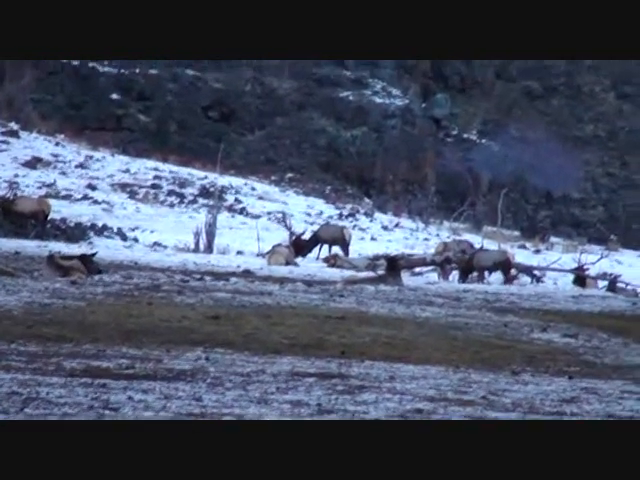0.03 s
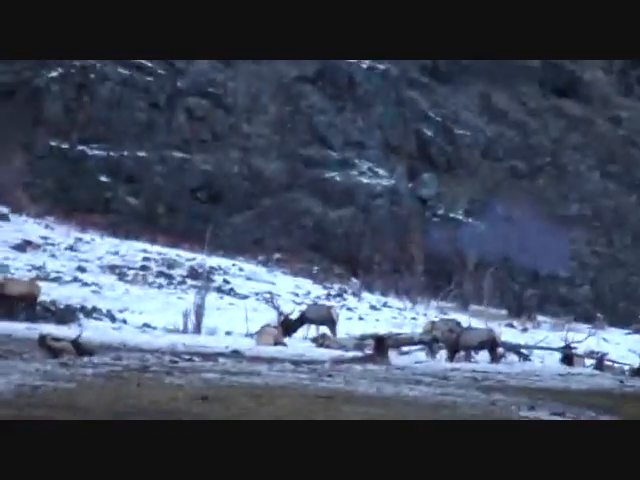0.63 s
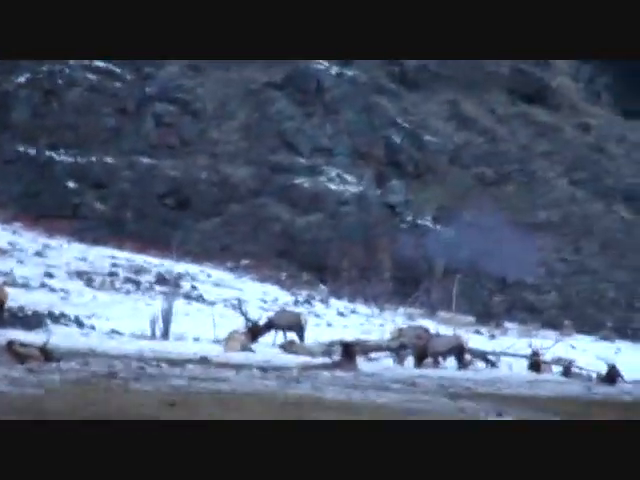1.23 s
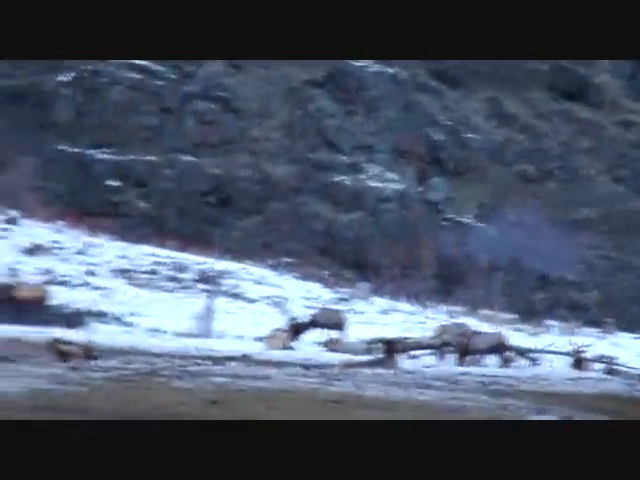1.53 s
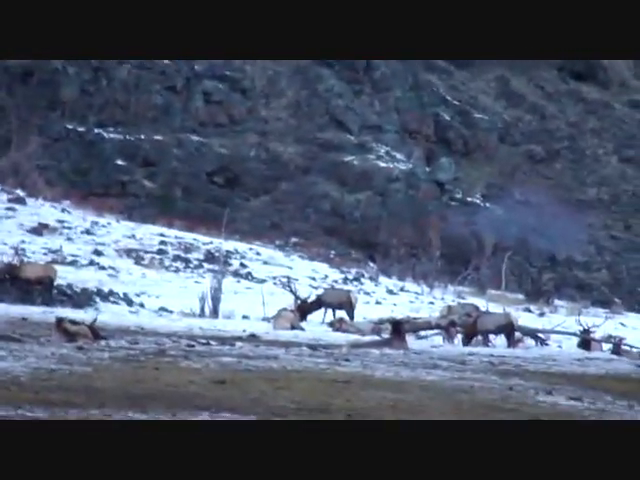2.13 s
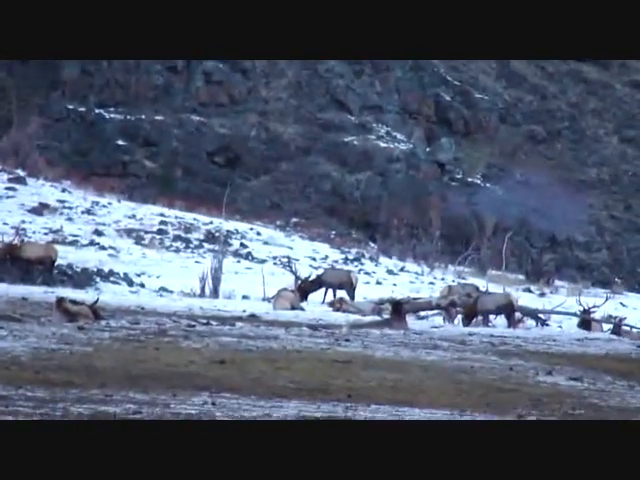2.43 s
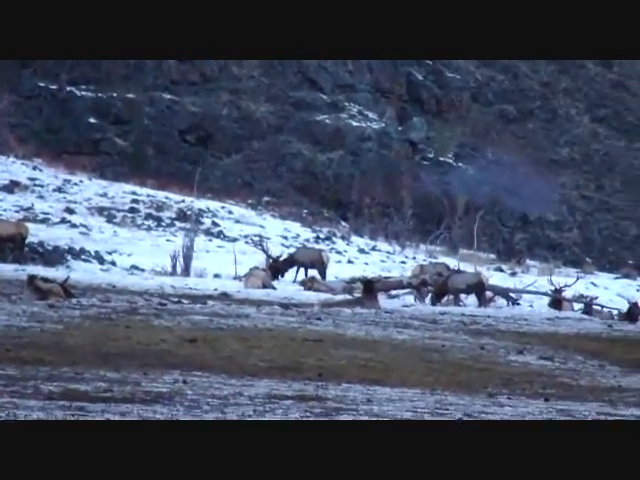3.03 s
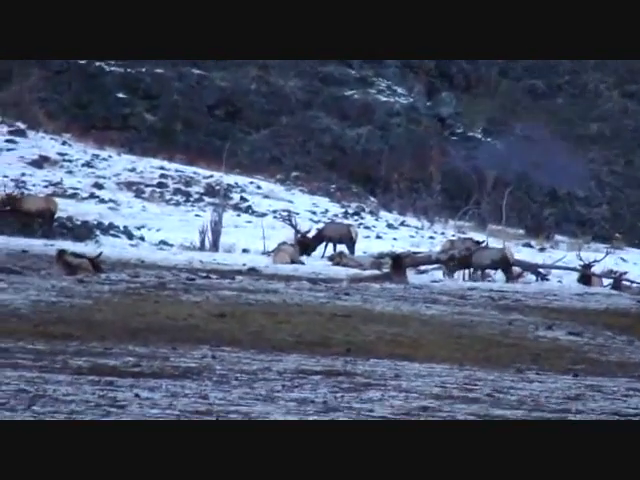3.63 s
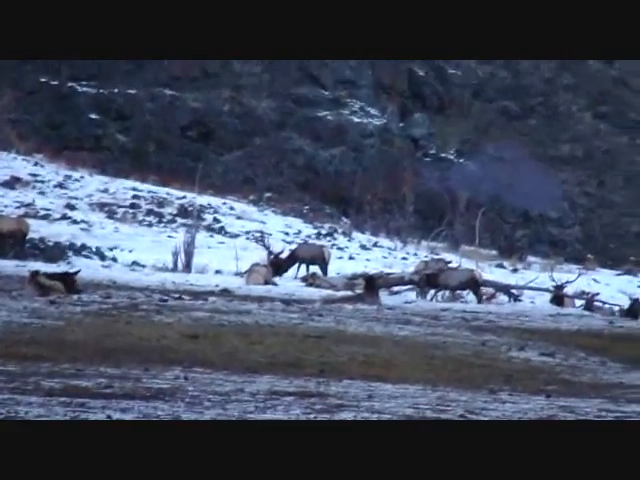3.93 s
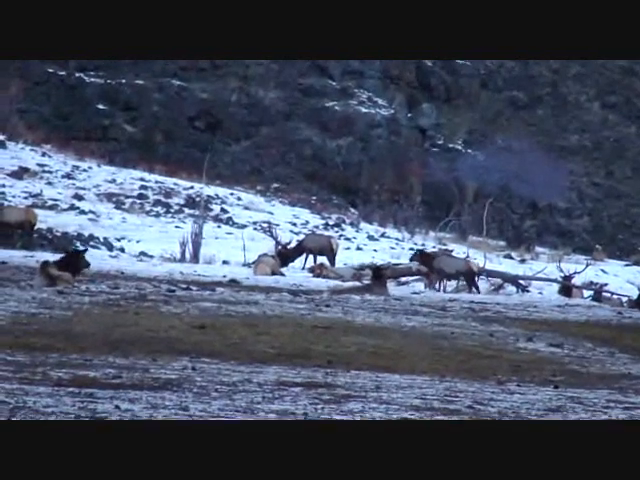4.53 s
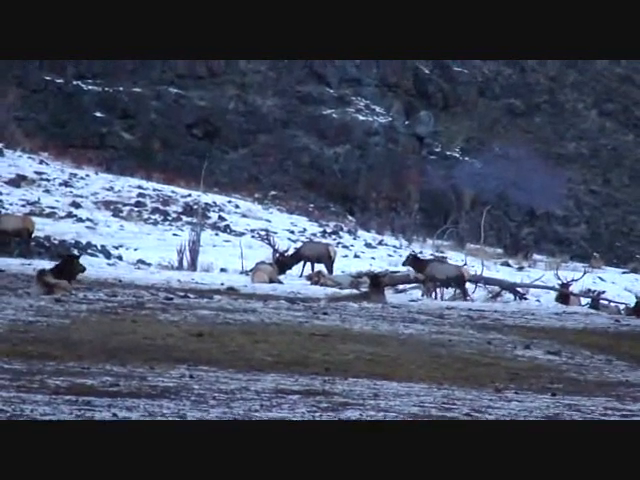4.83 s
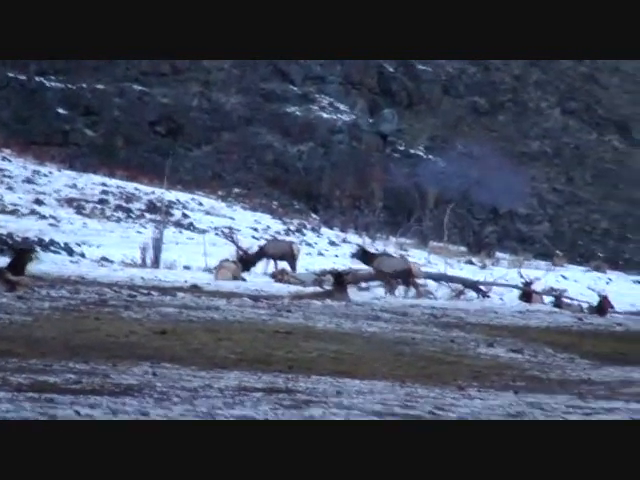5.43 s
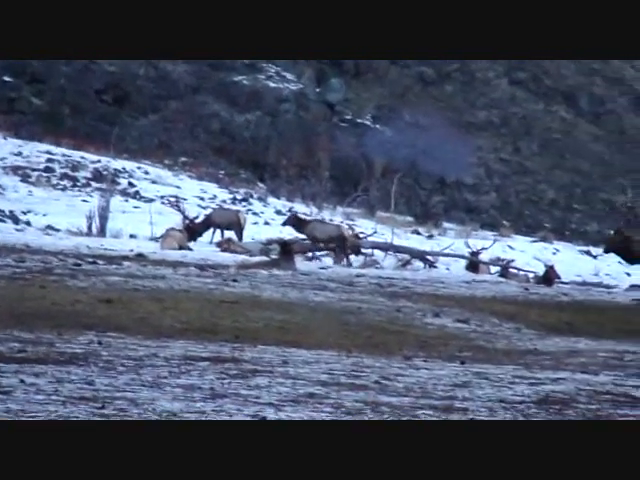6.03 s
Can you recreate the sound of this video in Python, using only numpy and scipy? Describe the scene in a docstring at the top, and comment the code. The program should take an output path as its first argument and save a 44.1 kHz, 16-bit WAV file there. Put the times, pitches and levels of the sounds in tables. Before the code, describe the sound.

Distant elk give thin, high mews over a steady outdoor rush, while fingers knock and rub close to the microphone.

```python
"""Elk on a snowy slope

Far elk mew: tight vocal folds give thin, high squeals that break and slide down, scattered by the
hillside along with two pipes from a small bird. Midway a faint, thin tone holds near 2.9 kHz.
Up close, fingers knock and rub on a hand-held camera, ringing its case. The camera whines faintly;
the valley rushes and drones behind it all."""
import sys
import numpy as np
from scipy import signal
from scipy.fft import rfft, irfft, next_fast_len
from scipy.io import wavfile

SR = 44100
rng = np.random.default_rng(int(sys.argv[2]) if len(sys.argv) > 2 else 0)


def to_wav(sig):
    """Store sig (one row per channel, or 1-D mono) as 16-bit WAV at the path in sys.argv[1].

    Samples outside -1..1 are clipped; the rate is SR.
    """
    pcm = np.clip(np.atleast_2d(sig), -1, 1) * 32767
    pcm = np.round(pcm).astype(np.int16)
    wavfile.write(sys.argv[1], SR, pcm.T)  # frames by channels


N = 276948
T = np.arange(N) / SR
FREQS = np.fft.rfftfreq(N, 1 / SR)


def undb(db):
    """Decibels to gain."""
    return 10 ** (np.asarray(db) / 20)


def unit(x):
    """Scale to rms 1."""
    return x / np.sqrt(np.mean(x ** 2))


def equalise(x, curve):
    """Filter by an EQ curve of (f/Hz, gain/dB) points; rms 1."""
    hz, db = np.transpose(curve)
    gain = undb(np.interp(np.log(np.maximum(FREQS, 1)), np.log(hz), db))
    return unit(irfft(rfft(x) * gain, N))


def noise_band(hz, width_hz, size=N):
    """Noise in one narrow bell; rms 1."""
    padded = next_fast_len(size, real=True)
    f = np.fft.rfftfreq(padded, 1 / SR)
    bell = np.exp(-2 * ((f - hz) / width_hz) ** 2)
    return unit(irfft(rfft(rng.standard_normal(padded)) * bell, padded)[:size])


def wobble(rate_hz, size=N):
    """Random modulation up to about the given rate; rms 1."""
    return noise_band(0, rate_hz, size)


# EQ of the valley bed: f/Hz, gain/dB
VALLEY_EQ = [(25, -24), (55, -32.5), (110, -16), (255, -9), (330, -3), (400, -6.5), (500, -0.5), (720, -3),
             (1150, -3.5), (2000, -11), (3000, -17), (4500, -20.5), (7800, -24), (11000, -26)]
def valley(level_db=-47.5, swell_db=1.05, flicker_db=1.0):
    """A distant rush whose octaves swell together and flicker alone."""
    octaves = np.log2(np.maximum(FREQS, 1))
    spectrum = rfft(equalise(rng.standard_normal(N), VALLEY_EQ))
    rush = np.zeros(N)
    for centre in range(4, 15):
        octave_band = irfft(spectrum * np.maximum(1 - np.abs(octaves - centre), 0), N)
        rush += octave_band * undb(flicker_db * wobble(20.5))
    return unit(rush) * undb(level_db + swell_db * wobble(0.75))


# Slow swell of one distant drone: t/s, level/dB
DRONE_SWELL = [(0, -66), (4.2, -63.5), (5.15, -57), (6.28, -60.5)]
# Narrow drones and whines: f/Hz, width/Hz, level/dB
HUM_BANDS = [(275.8, 8.4, -67.5), (300, 19, -64.5), (569, 46, -63), (2880, 82, -73), (7860, 8, -75.5),
             (7920, 110, -72)]
def hums(motor_hz=70.8, motor_db=-78, waver=.3):
    """Low distant drones, and the faint hum and whine of the running camera."""
    motor = np.sqrt(2) * np.sin(2 * np.pi * motor_hz * T) * (1 + waver * wobble(3.9))
    drone = undb(np.interp(T, *np.transpose(DRONE_SWELL))) * noise_band(hz=499, width_hz=43)
    steady = sum(undb(db) * noise_band(hz, width) for hz, width, db in HUM_BANDS)
    return undb(motor_db) * motor + drone + steady


# EQ of skin hissing on the case: f/Hz, gain/dB
RUB_EQ = [(80, -28), (300, -27), (1000, 3), (2000, 1.5), (3200, 3), (4500, -0.5), (6000, -2.5), (7000, 3),
          (7850, 4.5), (8800, -0.5), (11000, -11)]
# Finger strokes: start/s, rise/s, fall/s, level/dB
FINGER_STROKES = [(.338, .02, .015, -40), (.493, .007, .012, -49), (.657, .012, .08, -42),
                  (.69, .085, .085, -42), (.785, .105, .045, -37.8), (1.048, .007, .043, -36.7),
                  (1.17, .035, .055, -48.5), (1.225, .04, .03, -49.5), (1.47, .06, .06, -56),
                  (1.545, .06, .045, -41), (1.685, .025, .075, -50.5), (3.15, .07, .1, -52),
                  (3.31, .035, .03, -49), (3.345, .095, .085, -46.7)]
def rubbing(resting_db=-71, grain_db=3.5, grip_db=1.0, speed_curve=1.5):
    """Tiny slips of skin on plastic hiss through the case, louder as each stroke speeds up."""
    slips = rng.standard_normal(N) * undb(grain_db * rng.standard_normal(N))
    power = undb(resting_db) ** 2
    for start, rise, fall, db in FINGER_STROKES:
        speed = np.interp(T, [start, start + rise, start + rise + fall], [0, 1, 0])
        power = power + undb(db) ** 2 * speed ** speed_curve
    unsteady_grip = undb(grip_db * wobble(86))
    return equalise(slips, RUB_EQ) * np.sqrt(power) * unsteady_grip


# Modes of the camera's case: f/Hz, gain/dB, t60/s
CASE_MODES = [(196, -15, 0.019), (524, -8, 0.014), (810, -3, 0.018), (1160, 7, 0.0082), (1630, -3, 0.015),
              (1890, -3, 0.011), (2370, 0, 0.0084), (2920, -0.5, 0.013), (3420, -16, 0.032),
              (4230, -11, 0.0084), (5150, -3, 0.0072), (7040, -2.5, 0.0073), (7530, -3, 0.0074)]
# Finger knocks: t/s, level over 4 ms/dB, favoured f/Hz, fall-off either side/(dB per octave)
FINGER_KNOCKS = [(0.3504, -27.5, 1700, 14), (.3599, -21, 4800, 21), (0.3609, -18.5, 2840, 20),
                 (0.5004, -37.5, 7500, 7), (0.5036, -37.5, 190, 14), (0.6654, -34, 5000, 14.5),
                 (0.6664, -22, 1960, 15), (0.8075, -30, 1300, 7), (1.1113, -23, 550, 4.5),
                 (1.2551, -32.5, 1660, 16), (1.757, -41, 3170, 20), (3.3522, -34.5, 2080, 20),
                 (3.518, -47, 3200, 15), (4.8743, -46, 1000, 15), (4.8768, -38, 2400, 19)]
def knocks(chatter=0.17, chatter_s=.0012, low_hz=90, soft_hz=8200, reach_db=20):
    """Each knock is one sharp contact and a brief chatter, ringing the case's well-damped modes."""
    out, t = np.zeros(N), T[:2048]
    hz, mode_db, t60 = np.transpose(CASE_MODES)
    modes = np.exp(-np.log(1000) * t / t60[:, None]) * np.cos(2 * np.pi * hz[:, None] * t)
    for start, db, favoured_hz, falloff in FINGER_KNOCKS:
        ring = undb(mode_db - falloff * np.abs(np.log2(hz / favoured_hz))) @ modes
        contact = chatter * rng.standard_normal(len(t)) * np.exp(-t / chatter_s)
        contact[0] = 1
        # the small case gives no deep bass; a fingertip rounds off the treble the blow barely reaches
        reach_hz = min(favoured_hz * 2 ** (reach_db / falloff), soft_hz, SR / 3)
        soften = signal.butter(4, [low_hz, reach_hz], "band", fs=SR, output="sos")
        hit = signal.sosfilt(soften, signal.fftconvolve(ring, contact)[:len(t)])
        i = int(start * SR)
        out[i:i + len(t)] += undb(db) * hit * np.sqrt(.004 * SR / np.sum(hit ** 2))
    return out


def hillside(x, scatter_db=-12, scatter_s=0.011, tail_db=-23, t60=.95):
    """Quick scatter off the ground makes gliding harmonics flutter; rock and trees add a weak tail."""
    t = T[:SR]
    scatter = rng.standard_normal(SR) * np.exp(-t / scatter_s) * (t > .002)
    tail = rng.standard_normal(SR) * np.exp(-np.log(1000) * t / t60)
    scatter *= undb(scatter_db) / np.linalg.norm(scatter)
    tail *= undb(tail_db) / np.linalg.norm(tail)
    return x + signal.fftconvolve(x, scatter + tail)[:N]


# Bird pipes: start/s, length/s, f/Hz, level/dB
BIRD_NOTES = [(1.17, 0.087, 2112, -43), (1.837, 0.055, 2120, -53.5)]
def bird(sag=.018):
    """Short pure notes whose pitch sags a little in the middle."""
    out = np.zeros(N)
    for start, length, hz, db in BIRD_NOTES:
        progress = np.clip((T - start) / length, 0, 1)
        pitch = hz * (1 + sag * (2 * progress - 1) ** 2)
        phase = 2 * np.pi * np.cumsum(pitch) / SR
        out += undb(db) * np.sin(np.pi * progress) * np.sin(phase)
    return out


def throat(hz, throat_hz, width_octaves, fundamental_db, nose_hz=5100):
    """Each harmonic lights up as it passes the throat's resonance; the nose cuts off the top."""
    phase = 2 * np.pi * np.cumsum(hz) / SR
    voice = undb(fundamental_db) * np.sin(phase)
    for k in range(2, 10):
        resonance = undb(-12 * (np.log2(k * hz / throat_hz) / width_octaves) ** 2)
        nose = 1 / (1 + (k * hz / nose_hz) ** 20)
        voice += resonance * nose * np.sin(k * phase)
    return voice


LEAD_S, LEAD_DB, LEAD_RASP = .11, -19, .9  # hoarse lead-in before the folds catch
FADE_DB, FADE_CURVE, SLACK_RASP = 21, 1.6, .35  # the release sinks ever faster as the folds slacken
CRACK_S, CRACK_RASP, CRACK_DB = .004, .3, 3  # a register flip: its speed, added rasp and surge
# The voice cracks into another register: t/s, pitch ratio
VOICE_CRACKS = [(2.378, 1.1), (5.797, 1.05), (5.901, .935)]
# High squeals: the row at 2.75 s is a faint, thin held tone near 2.9 kHz; the others are elk mews.
# start/s, attack/s, release/s, level/dB, pitch crest/s, top pitch/Hz, pitch halving time/s,
# rasp (0-1), resonance/Hz, its width/octaves, fundamental gain/dB
SQUEALS = [ (0.0, .008, .19, -51, -.065, 1260, .31, .1, 2560, .6, -20),
           (1.545, .03, .15, -43, 1.45, 1405, .85, .3, 2700, .36, -15),
           (1.685, .022, .04, -44, 1.665, 1130, .175, .4, 3200, .3, -20),
           (1.69, .03, .1, -55, 1.745, 1380, .32, .3, 2700, .36, -15),
           (1.73, .02, .25, -55, 1.55, 1045, .555, .2, 3450, .39, -20),
           (2.29, .12, .5, -56, 2.41, 1345, .365, .15, 3200, 1.0, -15),
           (2.75, .3, .35, -60, 3.05, 1456, 3.5, .45, 2880, .4, -20),
           (3.61, .16, .27, -44, 3.655, 1205, .335, .08, 3250, .42, -18),
           (4.33, .03, .14, -53, 4.30, 1050, .53, .55, 3250, .35, 0),
           (4.435, .028, .05, -47, 4.41, 1140, .235, .3, 3250, .35, 0),
           (5.776, .045, .25, -30.7, 5.805, 1388, .228, .05, 2600, .75, -19), ]
def squeal(start, attack, release, level_db, crest, top_hz, halving_s, base_rasp,
           resonance_hz, width_octaves, fundamental_db, jitter=0.0045, shimmer_db=0.75, edge_s=.012):
    """A thin harmonic stack: an elk's tight folds arch it and slide it down; slow halving holds it."""
    sounding = (T > start - LEAD_S) & (T < start + attack + release)
    t = T[sounding]
    rise = np.clip((t - start) / attack, 0, 1)
    spent = np.clip((t - start - attack) / release, 0, 1)
    lead = undb(LEAD_DB) * np.clip((t - start) / LEAD_S + 1, 0, 1) * (1 - rise)
    end_fade = np.clip((t[-1] - t) / edge_s, 0, 1)
    effort = (lead + rise) * undb(level_db - FADE_DB * spent ** FADE_CURVE) * end_fade
    pitch = top_hz / (1 + ((np.maximum(t, start) - crest) / halving_s) ** 2)
    rasp = base_rasp + LEAD_RASP * lead / (lead + rise + 1e-9) + SLACK_RASP * spent ** 2
    for when, ratio in VOICE_CRACKS:
        flip = np.tanh((t - when) / CRACK_S)
        cracking = 1 - flip ** 2
        pitch *= ratio ** ((flip - np.sign(crest - when)) / 2)  # the crest keeps its pitch
        rasp += CRACK_RASP * cracking
        effort *= undb(CRACK_DB * cracking)
    rasp = np.clip(rasp, 0, 1)
    pitch *= 1 + jitter * wobble(200, len(t))
    voice = throat(pitch, resonance_hz, width_octaves, fundamental_db)
    # loose, uneven closures smear each harmonic into a hoarse band
    voice *= np.sqrt(1 - rasp ** 2) + rasp * wobble(560, len(t))
    out = np.zeros(N)
    out[sounding] = voice * effort * undb(shimmer_db * wobble(120, len(t)))
    return out


def scene():
    """Far animals, a faint held tone and close handling noise over the valley bed, in mono."""
    squeals = sum(squeal(*row) for row in SQUEALS)
    scattered = hillside(squeals + bird())
    return (scattered + knocks() + rubbing() + valley() + hums())[None]


def record(dry):
    """The camera cuts the top steeply."""
    high_cut = signal.ellip(12, .2, 70, 11050, fs=SR, output="sos")
    return signal.sosfilt(high_cut, dry)


dry = scene()
out = record(dry)
to_wav(out)
```